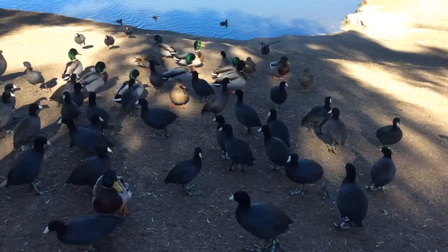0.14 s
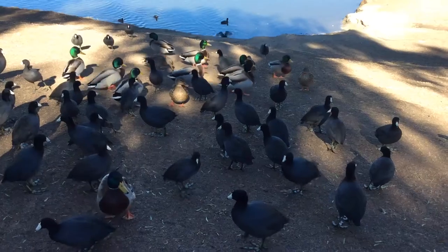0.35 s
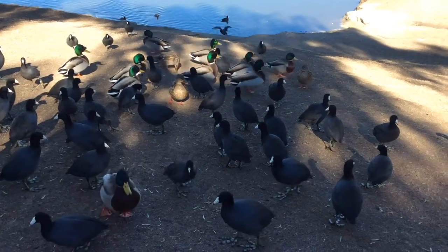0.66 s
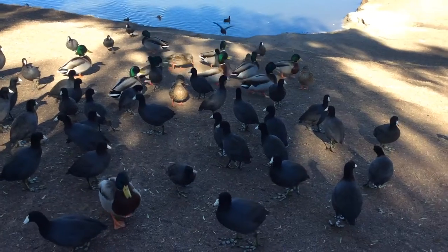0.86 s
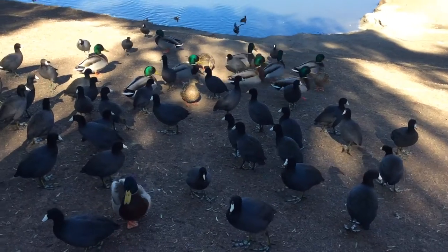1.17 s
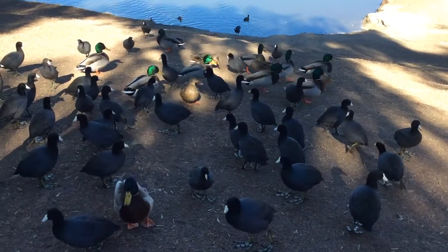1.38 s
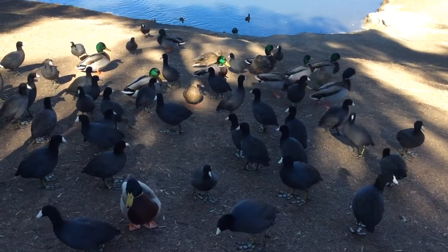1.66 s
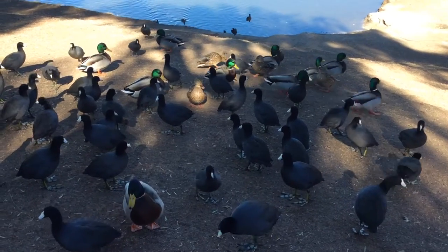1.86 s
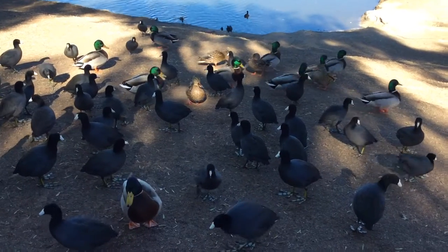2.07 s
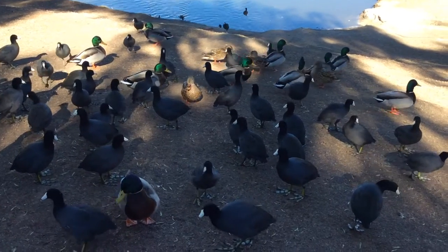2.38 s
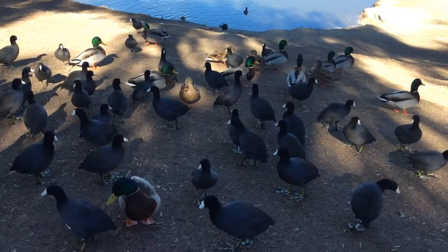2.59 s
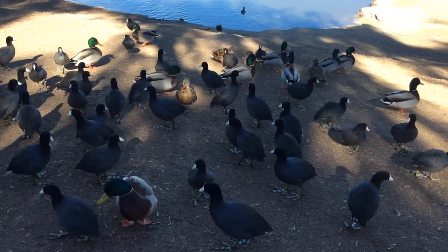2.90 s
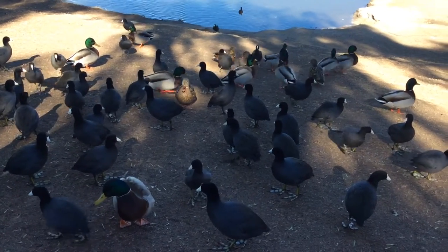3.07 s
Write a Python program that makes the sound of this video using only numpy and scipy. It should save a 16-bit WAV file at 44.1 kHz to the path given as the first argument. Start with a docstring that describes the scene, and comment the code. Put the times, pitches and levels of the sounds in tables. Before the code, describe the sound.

A mixed waterfowl flock gives rapid hoarse quacks and sharp clucks outdoors, with distant traffic droning.

```python
"""Ducks and coots crowd a pond shore. After a short silence, traffic rumble, air hiss and rustle (coloured noise)
begin with a distant engine (gliding sines) that speeds up and eases off over steady hums. Nearer birds cluck in
short fast pulse trains, dry ticks (noise bursts) fall between, and drakes rasp in slow pulse trains; each pulse
rings resonances. Two birds yelp (overtone stacks), and small birds peep (single glides) in the middle and
later part."""
import sys
import numpy as np
from scipy import signal
from scipy.fft import rfft, irfft, next_fast_len
from scipy.io import wavfile
from scipy.ndimage import uniform_filter1d, map_coordinates

SR = 44100
rng = np.random.default_rng(int(sys.argv[2]) if len(sys.argv) > 2 else 0)


def to_wav(sig):
    """Store sig (one row per channel, or 1-D mono) as 16-bit WAV at the path in sys.argv[1].

    Samples outside -1..1 are clipped; the rate is SR.
    """
    pcm = np.clip(np.atleast_2d(sig), -1, 1) * 32767
    pcm = np.round(pcm).astype(np.int16)
    wavfile.write(sys.argv[1], SR, pcm.T)  # frames by channels


N = 142884
START_S, TOP_HZ = .1165, 15500

# Traffic rumble spectrum. Each row: frequency in Hz, relative density in dB per Hz.
RUMBLE_SPECTRUM = [(12, -84), (20, -21), (83, -5), (124, -2), (178, -12), (251, -12), (447, -29.5),
                   (507, -27), (1030, -25.5), (1500, -69), (1950, -92), (3300, -120)]
# Air hiss spectrum. Each row: frequency in Hz, relative density in dB per Hz.
AIR_SPECTRUM = [(590, -102), (1000, -2.5), (1300, 9), (1530, 15), (2040, -3.5), (3010, -11), (5270, -52.5),
                (14300, 3), (15500, -20)]
# Rustle level. Each row: time in s, level in dB before RUSTLE_LIFT_DB.
RUSTLE_LEVEL = [(0.13, -81.5), (0.22, -71.5), (0.49, -71), (0.5, -59), (0.53, -75.5), (0.87, -67.5),
                (0.91, -77), (0.95, -65.5), (1.08, -69), (2.15, -74), (2.16, -69.5), (2.27, -73.5),
                (2.29, -58), (2.31, -73), (3.13, -76), (3.14, -66), (3.17, -74.5), (3.24, -70)]
# Rustle spectrum. Each row: frequency in Hz, relative level in dB.
RUSTLE_SPECTRUM = [(2000, 14), (4000, 0), (8000, -1.5), (15500, -5.5)]
RUMBLE_DB, AIR_DB, AIR_SWELL_DB = -55.5, -77, 1.5
RUSTLE_LIFT_DB, RUSTLE_FLUTTER_DB = 5, 3.5

# Engine pitch. Each row: time in s, firing rate in Hz.
ENGINE_PITCH = [(.13, 97.5), (.35, 100.7), (.85, 110.3), (1.25, 115.5), (1.65, 122.5), (2.0, 126),
                (2.4, 129), (2.55, 127.5), (2.68, 115.7), (2.85, 113.2), (3.24, 114)]
# Engine level. Each row: time in s, firing tone in dB rms, octave in dB rms.
ENGINE_LEVEL = [(0.13, -60.5, -63), (0.34, -46, -68), (0.36, -45.5, -62), (0.48, -63, -63.5),
                (0.5, -48.5, -54), (0.61, -51, -70), (0.66, -51.5, -59.5), (0.74, -41, -60.5),
                (0.84, -54.5, -57), (1.09, -45.5, -54), (1.16, -63, -61.5), (1.21, -47, -49),
                (1.26, -43.5, -64.5), (1.32, -53.5, -54.5), (1.47, -45, -65), (1.54, -56.5, -56),
                (1.66, -41.5, -64.5), (1.72, -59, -80), (1.84, -45, -74), (1.86, -48, -57.5),
                (1.95, -58, -78), (1.98, -48, -68), (2.03, -47.5, -88), (2.05, -55.5, -67.5),
                (2.4, -51.5, -75), (2.55, -63, -68), (2.59, -53.5, -64.5), (2.67, -48.5, -58),
                (2.7, -61, -60), (2.92, -45.5, -54), (3.01, -53, -69), (3.03, -53, -56.5), (3.07, -46, -62),
                (3.24, -44.5, -57)]
# Steady low tones. Each row: frequency in Hz, level in dB rms, waver in knots per s.
HUMS = [(79.5, -57, 6), (137, -66, 4), (160, -66, 6), (335, -76, 5), (484, -75, 12)]
ENGINE_WAVER_DB, HUM_WAVER_DB, HUM_WANDER_RAD = 1, 2.5, .5

# Random spread of every pulse train; detune is a fraction of the pitch.
PULSE_SCATTER_DB, MODE_SCATTER_DB, DETUNE = 1.5, 2, .02
VOICE_FLOOR_HZ = 222

# Clucks. Each row: first pulse in s, length in s, pulse rate in Hz, level in dB, then boom, chest,
# whistle and hiss in dB relative to that level.
CLUCKS = [(0.187, 0.034, 155.7, -39.5, 6.5, 4, -27, -10.5), (0.364, 0.033, 158.5, -40, 1.5, 2.5, -14, -6.5),
          (.500, 0.014, 140.2, -33.5, 5, 2.5, -16.5, -10),
          (0.7955, 0.038, 162.9, -28, -5.5, -17.5, -16.5, -21),
          (0.857, 0.021, 185.2, -40.5, 2.5, 1, -8, -7), (0.962, 0.011, 97, -42, 2, -6, -19, -13),
          (1.025, 0.039, 192.4, -42.5, 4.5, 1.5, -9, -4.5), (1.619, 0.028, 157, -56, 4, 10.5, 0, 3),
          (2.165, 0.014, 177, -37, -31, -17, -31, -41), (2.179, 0.014, 157.5, -41, -3, -1, -9.5, -3.5),
          (2.281, 0.023, 159.7, -30.5, -9, -13, -15, -7),
          (2.426, 0.025, 146.9, -31.5, -7, -10, -11.5, -10.5),
          (2.55, .032, 184.4, -33.5, -4, -9.5, -30, -10), (2.777, 0.042, 140, -56, 13.5, 5, -32, -18)]
# Cluck throat resonances. Each row: frequency in Hz, relative level in dB, t60 in s.
CLUCK_THROAT_MODES = [(1660, 0, .009), (2050, -1, .008), (2800, -13, .007)]
# Cluck chest resonances. Each row: frequency in Hz, level in dB before the chest level, t60 in s.
CHEST_MODES = [(510, -3, 0.0091), (749, 1, 0.0075), (1173, 1.5, 0.0086)]
# Cluck whistle resonances. Each row: frequency in Hz, level in dB before the whistle level, t60 in s.
WHISTLE_MODES = [(3900, -2, .005), (4700, -4, .005), (5380, 0, .008), (7200, -10, .004)]
# Hiss of cluck pulses and ticks. Each row: frequency in Hz, relative level in dB.
BREATH_SPECTRUM = [(1000, -38), (3500, -4), (6000, -9), (9000, -15.5), (15000, -32.5)]
BOOM_HZ, BOOM_T60_S = 285, 0.013

# Bills and feet on grit. Each row: time in s, level in dB before TICK_TRIM_DB.
TICKS = [(0.2409, -59), (1.255, -52), (1.4345, -65), (1.8696, -57.5), (2.0046, -59), (2.6843, -59),
         (3.1389, -62.5)]
TICK_TRIM_DB, TICK_T60_S = -2.5, 0.016

# Drake rasps. Each row: first pulse in s, length in s, initial pulse rate in Hz, level in dB, throat in Hz
# at full swell, then bill, upper and hiss in dB relative to that level.
RASPS = [(.250, 0.04, 86.5, -45, 1546, 1, -5.5, -16), (0.297, 0.086, 94, -50, 1530, 11.5, 4, -18),
         (0.271, 0.087, 87.8, -49, 1485, 9.5, 5.5, -9), (0.39, 0.086, 81.8, -48.5, 1467, -2.5, -4.5, -34),
         (0.479, 0.0537, 90, -41.5, 1481, 4.5, -15, -12), (0.537, 0.078, 85.19, -54, 1570, 12.5, 1, -4),
         (.614, 0.032, 98, -54, 1545, 5.5, 3, -6.5), (0.709, 0.07, 91, -47, 1570, 0, -13, -12),
         (0.743, 0.12, 118.8, -41, 1608, 2.5, -5, -39), (0.833, 0.088, 86.06, -49, 1547, 7, -4, -12),
         (0.906, 0.071, 89.64, -53, 1590, 4, -8, -30), (0.95, 0.056, 102.5, -47.5, 1593, 5.5, 1.5, -13),
         (0.989, 0.09, 90.74, -46, 1625, 1, 6, -6.5), (1.066, 0.061, 91.6, -52, 1550, -0.5, -19, -22),
         (1.132, 0.066, 102.6, -56, 1173, -17, -16, -14), (1.176, 0.061, 96.3, -51.5, 1615, 2, 2, -5),
         (1.274, .075, 102.2, -39, 1617, -3, -1, -13.5), (1.355, 0.059, 81, -58.5, 1440, -12, -22, -16),
         (1.477, 0.055, 94, -42.5, 1672, -0.5, -4, -10), (1.546, 0.043, 87.96, -54.5, 1520, -11, -3, -12),
         (1.572, 0.047, 110, -55, 1300, -4, -18, -35), (1.615, 0.088, 94.7, -53, 1075, -30, -31, -20),
         (1.747, 0.12, 87.4, -52.5, 1570, 2, 0.5, -12), (1.874, 0.064, 101.1, -55.5, 1480, 0.5, 7.5, -2.5),
         (1.943, 0.079, 71, -46.5, 1577, -0.5, -2.5, -15.5), (2.208, 0.054, 88.4, -70, 1500, -9, 3, -18),
         (2.24, 0.049, 98.1, -54.5, 1600, 3.5, 1, -33), (2.328, 0.0557, 98, -44, 1516, -2, -6.5, -24),
         (2.344, 0.034, 83.4, -51, 1560, 2, -19, -13), (2.455, 0.014, 92.59, -42, 1570, -12, -22, -31),
         (2.48, 0.036, 102.6, -72, 1500, -7, -9, -22), (2.519, 0.097, 90.72, -46, 1566, 0.5, -8, -23),
         (2.586, .055, 86.2, -58.5, 1540, 7, 6, -30), (2.705, 0.078, 96.1, -44, 1350, -3, -1, -15),
         (2.721, 0.086, 95.7, -40, 1600, -1, -5.5, -32), (2.795, .05, 71, -68, 1410, -11, -11, -28),
         (2.945, 0.025, 118.8, -48.5, 1370, -12, -13, -17),
         (2.968, 0.038, 76.9, -32.5, 1595, -14.5, -7.5, -23),
         (3.01, 0.067, 100.7, -48, 1613, 3.5, -1.5, -18.5), (3.07, 0.069, 93.5, -51, 1590, 1.5, 3, -7),
         (3.142, 0.059, 100.7, -51, 1610, -4, -4.5, -17), (3.193, .06, 89, -39.5, 1558, -5.5, -11.5, -26)]
# Bill, upper and top resonances. Each row: frequency in Hz at full swell, t60 in s.
RASP_MODES = [(2010, 0.027), (2630, 0.011), (3340, 0.021)]
# Hiss of rasp pulses. Each row: frequency in Hz, relative level in dB.
RASP_BREATH_SPECTRUM = [(2500, -33), (3500, 4), (4700, -7), (6000, 0), (7500, -12), (10000, -12),
                        (15000, -38)]
RASP_T60_S, RASP_TOP_DB = .034, -13  # throat decay; top mode relative to upper

# Yelps. Each row: start in s, length in s, top pitch in Hz, level in dB.
YELPS = [(0.293, 0.032, 806, -44.5), (2.009, 0.06, 414.5, -50)]
# Yelp overtone colour. Each row: frequency in Hz, relative level in dB.
YELP_COLOUR = [(400, -20), (800, -8.5), (1250, -18), (1650, 2.5), (2100, -16), (2550, -7), (3300, -45),
               (4100, -15), (4700, -18), (8000, -60)]
YELP_SAG, YELP_ROUGH_RAD, YELP_FLICKER_DB = .16, .25, 1  # sag: fraction of top pitch

# Peeps of small birds. Each row: start in s, length in s, start pitch in Hz, end pitch in Hz.
PEEPS = [(1.38, 0.021, 3660, 3900), (1.404, 0.018, 4566, 4900), (1.422, 0.013, 4150, 4000),
         (1.593, 0.075, 4300, 5300), (1.717, .03, 4020, 4960), (1.722, .02, 3231, 3480),
         (1.823, 0.033, 3960, 4700), (1.948, 0.023, 4240, 4770), (2.066, 0.02, 4400, 4900),
         (2.393, 0.028, 4470, 4400), (2.40, 0.022, 3200, 3360)]
PEEP_DB, PEEP_FLICKER_DB, PEEP_SMEAR_RAD = -70, 3, 1.4

ECHO_DB, ECHO_T60_S, ECHO_DELAY_S = -11, .09, .004


def amp(db):
    """Amplitude from dB."""
    return 10 ** (np.asarray(db) / 20)


def unit(x):
    """x scaled to rms 1."""
    return x / np.sqrt(np.mean(x ** 2) + 1e-20)


def along(points, hz):
    """(Hz, value) points read on a log frequency axis."""
    f, v = np.transpose(points)
    return np.interp(np.log(hz + 1), np.log(f + 1), v)


def curves(rows):
    """One value per sample for each column after the time."""
    s, *cols = np.transpose(rows)
    return [np.interp(np.arange(N) / SR, s, c) for c in cols]


def wobble(rate_hz):
    """Smooth random curve through rate_hz knots a second."""
    return map_coordinates(rng.standard_normal(N // 100), [np.arange(N) * rate_hz / SR])


def filtered(x, response):
    """x times a response of frequency."""
    m = next_fast_len(N + SR // 2)
    return irfft(rfft(x, m) * response(np.fft.rfftfreq(m, 1 / SR)), m)[..., :N]


def noise(spectrum):
    """Coloured noise of rms 1."""
    return unit(filtered(rng.standard_normal(N), lambda hz: amp(along(spectrum, hz))))


def arch(u, peak_at):
    """Swell from 0 to 1 and back over u = 0..1."""
    return np.sin(np.pi * np.clip(u, 0, 1) ** (np.log(.5) / np.log(peak_at)))


def background():
    """Coloured noise: steady traffic rumble, swelling air hiss, a fluttering bright rustle that spikes with
    some of the clucks."""
    level_db, = curves(RUSTLE_LEVEL)
    rustle_db = level_db + RUSTLE_LIFT_DB + RUSTLE_FLUTTER_DB * wobble(90)
    rustle = amp(rustle_db) * noise(RUSTLE_SPECTRUM)
    # The last pair holds the rumble flat above 3 kHz.
    rumble = amp(RUMBLE_DB) * noise([(6.2, -5), *RUMBLE_SPECTRUM, (3000, -49.5)])
    air = amp(AIR_DB + AIR_SWELL_DB * wobble(11.6)) * noise([(500, -49), *AIR_SPECTRUM])
    return rumble + air + rustle


def engine():
    """Far engine: a sine at the firing rate and its octave, both wavering in level."""
    hz, = curves(ENGINE_PITCH)
    db, octave_db = curves(ENGINE_LEVEL)
    phase = 2 * np.pi * np.cumsum(hz) / SR
    firing = amp(db + ENGINE_WAVER_DB * wobble(29)) * np.sin(phase)
    octave = amp(octave_db + ENGINE_WAVER_DB * wobble(14)) * np.sin(2 * phase)
    return np.sqrt(2) * (firing + octave)


def hums():
    """Steady low sines, wavering in level and phase."""
    t, out = np.arange(N) / SR, np.zeros(N)
    for hz, db, rate_hz in HUMS:
        level = amp(db + HUM_WAVER_DB * wobble(rate_hz))
        phase = 2 * np.pi * hz * t + HUM_WANDER_RAD * wobble(rate_hz)
        out += level * np.sin(phase)
    return np.sqrt(2) * out


def add_pulses(voice, hiss, row, modes, hiss_db, hiss_t60_s, rise_s, jitter, rough, peak_at,
               slows=0, lag_s=0, opens=0):
    """Throat pulses: each rings the modes anew, part tone and part noise, and lets out a puff of hiss.

    jitter is in pulse periods, rough is the noise share, lag_s is the delay of higher modes per octave,
    opens is the fraction by which the modes drop as the swell closes."""
    start_s, length_s, rate_hz, db = row
    k, t = np.arange(16), np.arange(SR // 25) / SR
    luck = rng.standard_normal((16, 2 + 2 * len(modes)))
    mode_luck = luck[:, 2:].reshape(16, 2, -1, 1)
    flutter = rng.standard_normal((16, len(modes), len(t)))
    flutter = unit(uniform_filter1d(uniform_filter1d(flutter, size=80), size=80))

    times = (k * (1 + slows * k / (rate_hz * length_s)) + jitter * luck[:, 0]) / rate_hz
    swell = arch((times + .5 / rate_hz) / (length_s + .5 / rate_hz), peak_at)
    sizes = amp(db + PULSE_SCATTER_DB * luck[:, 1]) * swell

    hz, level_db, t60_s = np.transpose(modes)[:, :, None]
    age = np.maximum(t - lag_s * np.log2(hz / hz[0]), 0)
    shape = amp(-60 * age / t60_s) * (1 - np.exp(-age / rise_s)) ** 2
    shape *= amp(level_db) / shape.max(1, keepdims=True)
    puff = amp(hiss_db - 60 * t / hiss_t60_s) * (1 - np.exp(-t / rise_s))

    onsets_s = start_s + times - t[shape[0].argmax()]  # the first mode peaks on the pulse time
    for n in k:
        level_luck, pitch_luck = mode_luck[n]
        pulse_hz = hz * (1 + DETUNE * pitch_luck - opens * (1 - swell[n]))
        envelope = amp(MODE_SCATTER_DB * level_luck) * shape * (1 - rough + rough * flutter[n])
        ring = envelope * np.sin(2 * np.pi * pulse_hz * age)
        i = round(onsets_s[n] * SR)
        voice[i:i + len(t)] += sizes[n] * ring.sum(0)
        hiss[i:i + len(t)] += sizes[n] * puff


def clucks():
    """Short fast pulse trains ringing throat, boom, chest and whistle: (voice, hiss envelope)."""
    voice, hiss = np.zeros((2, N + SR))
    for *row, boom_db, chest_db, whistle_db, hiss_db in CLUCKS:
        boom = [(BOOM_HZ, boom_db, BOOM_T60_S)]
        chest = np.add(CHEST_MODES, [0, chest_db, 0])
        whistle = np.add(WHISTLE_MODES, [0, whistle_db, 0])
        modes = np.vstack([CLUCK_THROAT_MODES, boom, chest, whistle])
        add_pulses(voice, hiss, row, modes, hiss_db, hiss_t60_s=.006, rise_s=.0003,
                   jitter=.02, rough=.12, peak_at=.45)
    return voice[:N], hiss[:N]


def ticks():
    """Small dry clicks: noise with instant onset and exponential decay."""
    t, gate = np.arange(N) / SR, np.zeros(N)
    for s, db in TICKS:
        gate += amp(db + TICK_TRIM_DB - 60 * np.abs(t - s) / TICK_T60_S) * (t >= s)
    return noise(BREATH_SPECTRUM) * gate


def rasps():
    """Slowing pulse trains; throat and bill modes rise as the call swells: (voice, hiss envelope)."""
    voice, hiss = np.zeros((2, N + SR))
    for *row, throat_hz, bill_db, upper_db, hiss_db in RASPS:
        levels_db = bill_db, upper_db, upper_db + RASP_TOP_DB
        modes = [(throat_hz, 0, RASP_T60_S)]
        modes += [(hz, db, t60_s) for (hz, t60_s), db in zip(RASP_MODES, levels_db)]
        add_pulses(voice, hiss, row, modes, hiss_db, hiss_t60_s=.032, rise_s=.002, jitter=.04, rough=.42,
                   peak_at=.51, slows=.08, lag_s=.001534, opens=.058)
    return voice[:N], hiss[:N]


def flock():
    """Rasps and clucks with their lows cut, plus breath noise gated by the pulses."""
    rasp_voice, rasp_hiss = rasps()
    cluck_voice, cluck_hiss = clucks()
    voiced = filtered(rasp_voice + cluck_voice, lambda hz: 1 / (1 + (VOICE_FLOOR_HZ / (hz + 1)) ** 4))
    return voiced + rasp_hiss * noise(RASP_BREATH_SPECTRUM) + cluck_hiss * noise(BREATH_SPECTRUM)


def yelps():
    """Ten coloured harmonics that arch together in pitch and level."""
    t, out = np.arange(N) / SR, np.zeros(N)
    for s, length_s, top_hz, db in YELPS:
        u = np.clip((t - s) / length_s, 0, 1)
        hz = top_hz * (1 - YELP_SAG * (1 - arch(u, 0.38)))
        phase = 2 * np.pi * np.cumsum(hz) / SR + YELP_ROUGH_RAD * wobble(300)
        stack = sum(amp(along(YELP_COLOUR, k * top_hz)) * np.sin(k * phase) for k in range(1, 11))
        out += amp(db + YELP_FLICKER_DB * wobble(209)) * arch(u, 0.57) * stack
    return out


def peeps():
    """Single sine glides with smeared phase and flickering level."""
    t, out = np.arange(N) / SR, np.zeros(N)
    for s, length_s, from_hz, to_hz in PEEPS:
        u = np.clip((t - s) / length_s, 0, 1)
        level = amp(PEEP_DB + PEEP_FLICKER_DB * wobble(170)) * arch(u, 0.34)
        hz = from_hz + (to_hz - from_hz) * u
        phase = PEEP_SMEAR_RAD * wobble(400) + 2 * np.pi * np.cumsum(hz) / SR
        out += level * np.sin(phase)
    return out


def echo(x):
    """Diffuse echo: x convolved with a decaying noise tail of unit energy."""
    t = np.arange(SR // 5) / SR
    tail = rng.standard_normal(len(t)) * amp(-60 * t / ECHO_T60_S) * (t > ECHO_DELAY_S)
    return amp(ECHO_DB) * signal.fftconvolve(x, tail / np.linalg.norm(tail))[:N]


def scene():
    """Birds and ticks get the echo; engine, hums and background stay dry."""
    birds = flock() + yelps() + peeps() + ticks()
    return (birds + echo(birds) + engine() + hums() + background())[None]


def record(dry):
    """Sound begins after a short silence; nothing above the band limit."""
    return filtered(dry * (np.arange(N) >= START_S * SR), lambda hz: hz < TOP_HZ)


dry = scene()
out = record(dry)
to_wav(out)
```